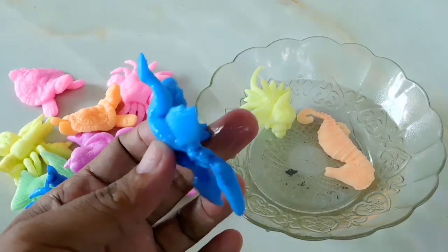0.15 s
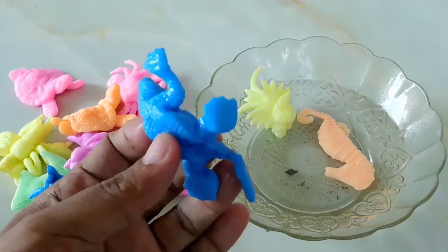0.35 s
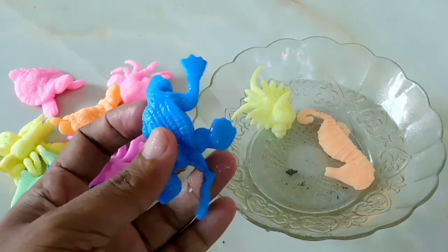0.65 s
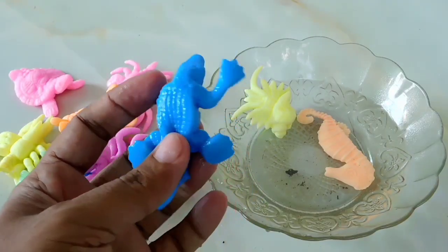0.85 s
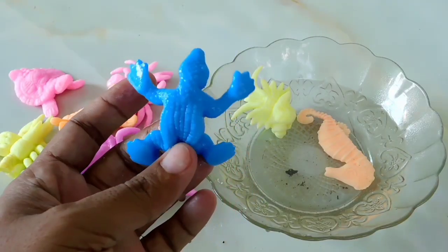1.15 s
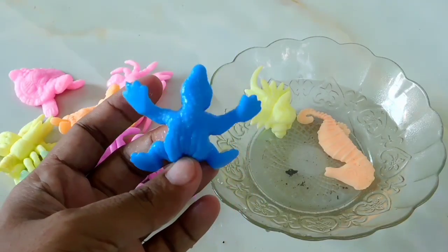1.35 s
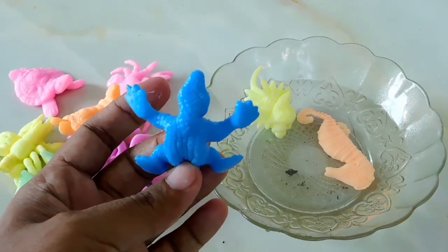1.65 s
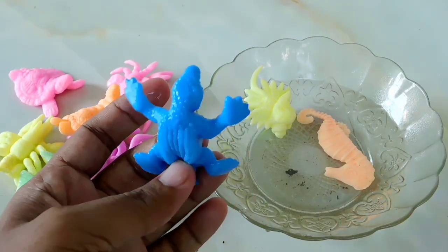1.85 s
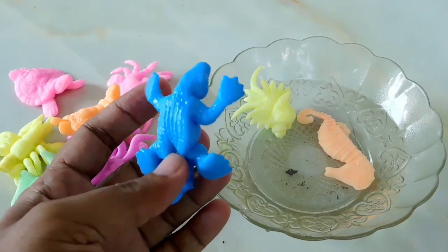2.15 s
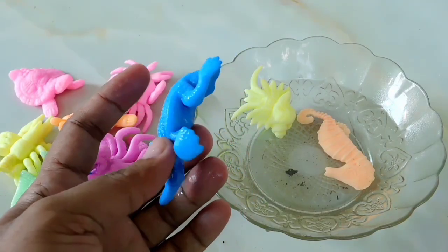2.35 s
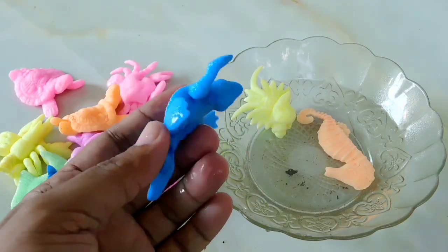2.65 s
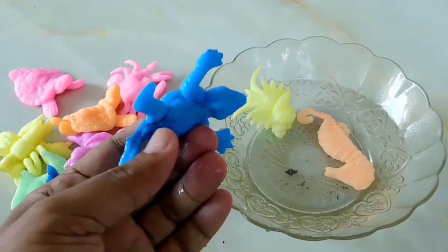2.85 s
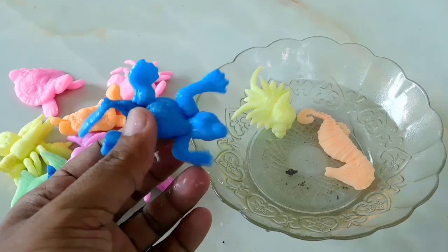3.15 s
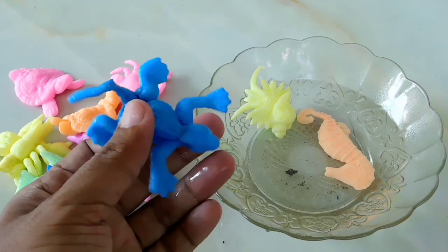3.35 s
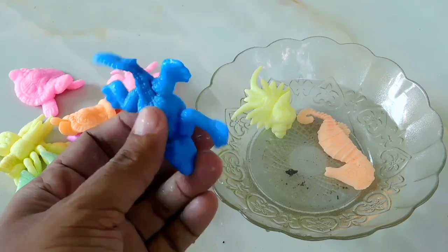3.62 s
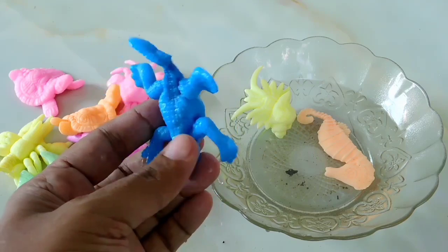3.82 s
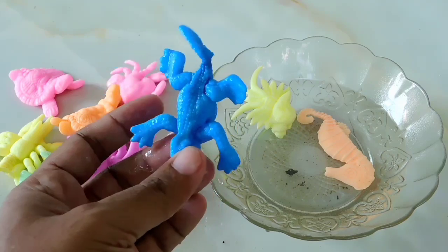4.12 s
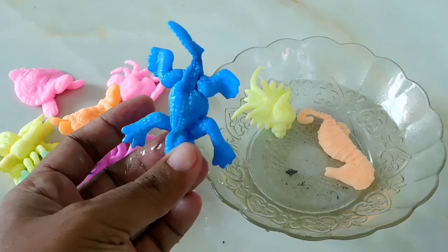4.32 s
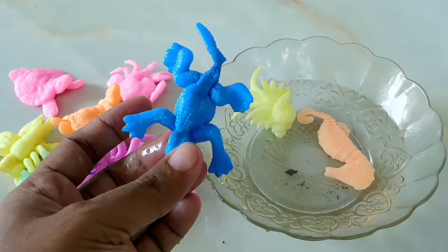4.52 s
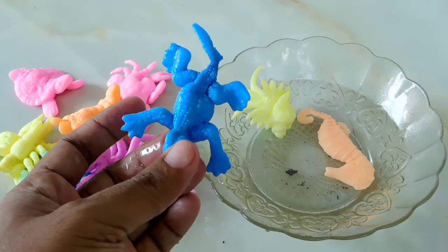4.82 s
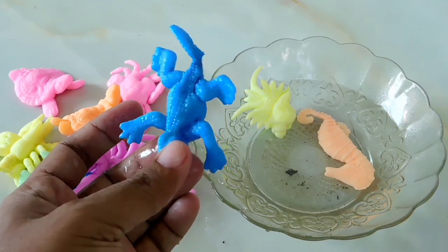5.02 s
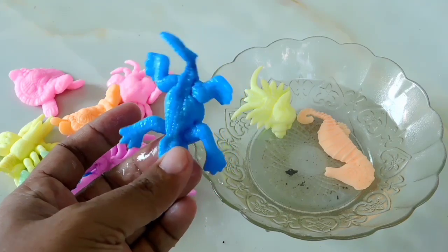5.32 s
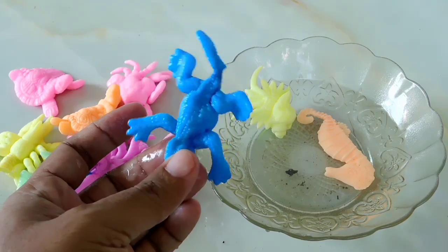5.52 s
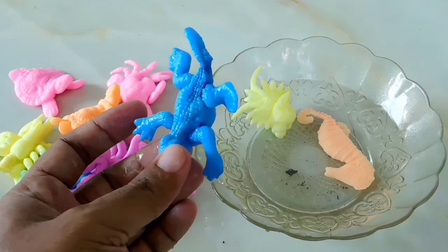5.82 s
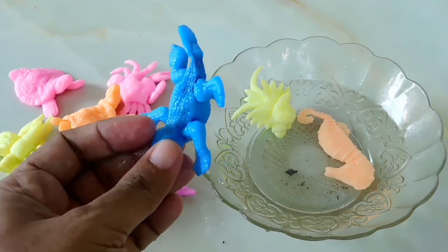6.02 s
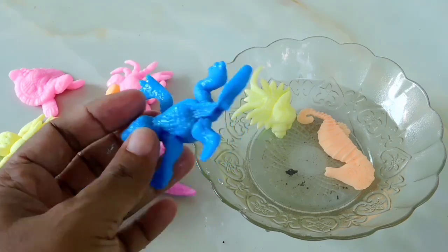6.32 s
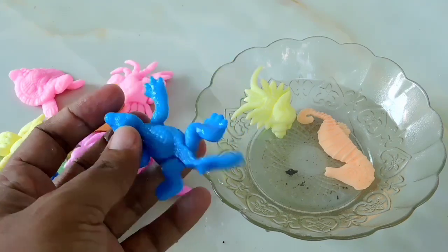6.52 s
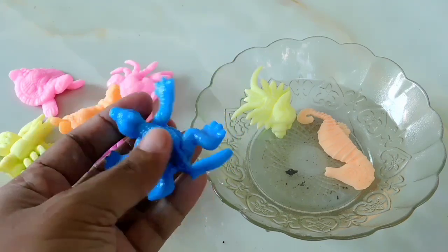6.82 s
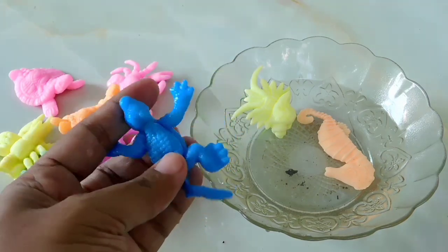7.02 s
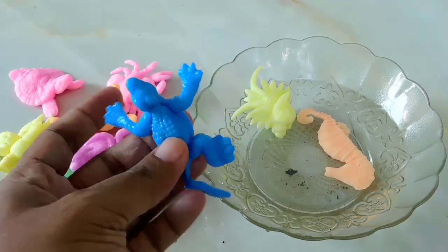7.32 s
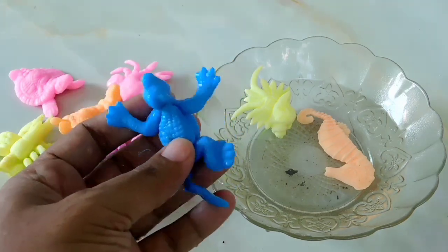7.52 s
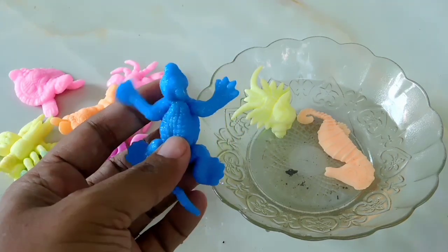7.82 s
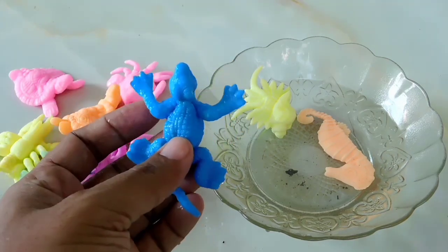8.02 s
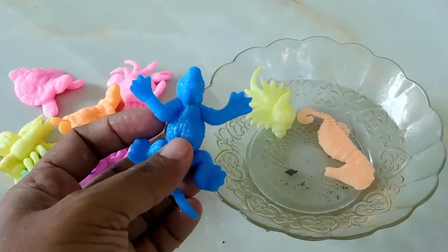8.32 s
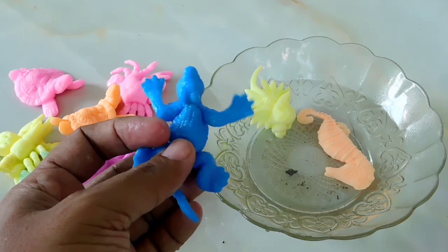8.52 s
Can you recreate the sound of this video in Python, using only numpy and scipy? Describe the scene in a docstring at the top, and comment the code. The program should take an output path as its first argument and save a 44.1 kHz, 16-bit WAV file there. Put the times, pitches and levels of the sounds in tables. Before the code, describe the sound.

Quick irregular water drops tick on a water surface and ring with tiny high bubbles, surrounded by dense fine pattering and soft gurgling. Larger bubbles give short hollow bloops, becoming frequent after the first two seconds. The dripping carries on steadily to the end without stopping. The microphone is close in a small hard room, with dull distant motor rumble outside and slightly noise-suppressed, centred sound.

```python
"""Fast dripping into a water-filled vessel.

Indoors, each drop ticks on the surface (noise burst) and rings two trapped bubbles (damped sines).
Large bubbles sound in the hollow of the vessel, mostly near 1.1 kHz; deeper ones glug below it.
Finer drops patter over fizz and soft gurgling, all with a short hard room tail.
Outside, traffic rumbles (filtered noise, motor orders) with the drone of passing engines (gliding sines)."""
import sys
import numpy as np
from scipy import signal
from scipy.fft import rfft, irfft, next_fast_len
from scipy.io import wavfile
from scipy.ndimage import uniform_filter1d, map_coordinates

SR = 44100
rng = np.random.default_rng(int(sys.argv[2]) if len(sys.argv) > 2 else 0)


def gain_from_decibels(decibels):
    """Convert decibel values to linear amplitude factors."""
    exponent = np.asarray(decibels, float) / 20
    return 10 ** exponent


def dump(signal):
    """Clip the signal to [-1, 1] and save it as 16-bit WAV at the path in sys.argv[1]."""
    limited = np.clip(np.atleast_2d(signal).T, -1, 1)
    pcm = np.round(limited * 32767).astype(np.int16)
    wavfile.write(sys.argv[1], SR, pcm)


N = 382347

# drops, two bubbles each: start_s, peak_db, small_hz, large_hz, large_re_peak_db
DROPS = [(0.042, -37, 4850, 1450, -12), (0.0903, -39.5, 4560, 3060, -17.5), (0.1518, -47, 5010, 3160, -2),
         (0.157, -29, 5260, 2120, -8), (0.228, -37, 4260, 3520, -13.5), (0.2503, -35, 4100, 3580, -2),
         (0.2857, -46.5, 5510, 3060, -2.5), (0.3581, -43.5, 7400, 3050, 1), (0.394, -29, 4860, 3320, -6),
         (0.4237, -26, 6350, 4200, -35.5), (0.441, -27, 6530, 1500, -41), (0.4538, -25, 6490, 2770, -41),
         (0.5046, -33, 5030, 2250, -3.5), (0.5408, -35.5, 5120, 3100, -6), (0.5752, -29.5, 4330, 3010, -10),
         (0.6353, -34.5, 6180, 3000, -11), (0.6618, -38, 6580, 2040, -4), (0.7375, -28.5, 5660, 3250, -8.5),
         (0.7856, -24.5, 6430, 3010, -14), (0.851, -38.5, 6300, 2590, -6), (0.8939, -35, 7180, 2230, -5.5),
         (0.9283, -28.5, 4880, 4090, -8.5), (0.9776, -27.5, 4240, 3210, -6),
         (1.0062, -50.5, 5800, 2090, -14), (1.0262, -27.5, 6120, 3870, -22.5),
         (1.0665, -26, 5920, 2150, -27.5), (1.0985, -47.5, 5630, 2120, -4), (1.1112, -31.5, 4270, 2290, -5),
         (1.1747, -37.5, 5980, 4000, -11), (1.1806, -34.5, 5000, 3920, -8.5),
         (1.1985, -29, 4380, 4150, -19.5), (1.2414, -31.5, 4330, 3330, -9), (1.2995, -26, 6410, 2270, -12),
         (1.3411, -30.5, 5420, 2430, -14), (1.4566, -31, 6330, 3190, -14.5),
         (1.5212, -24, 5150, 3240, -12.5), (1.5634, -33.5, 4460, 3120, -5.5),
         (1.5776, -29.5, 6200, 2500, -8), (1.6106, -37, 6340, 2520, -12.5), (1.623, -27.5, 6350, 3460, 9),
         (1.646, -27, 4100, 3380, 0.5), (1.706, -24, 5300, 3060, -34), (1.739, -34.5, 6500, 3470, -13.5),
         (1.7654, -43, 5700, 3130, -23.5), (1.7983, -30.5, 6250, 3290, -11.5),
         (1.8392, -31.5, 6100, 2750, -22), (1.9734, -37, 4520, 4120, -4), (1.99, -29.5, 4800, 3420, -11.5),
         (2.0235, -29.5, 6620, 2550, -8), (2.0732, -35.5, 4270, 4170, -23.5), (2.1034, -36, 6300, 4120, -4),
         (2.1158, -25.5, 4100, 3580, -7), (2.147, -31, 5950, 2880, -17.5), (2.1846, -27, 6100, 1930, -14.5),
         (2.259, -35, 4150, 3860, -13), (2.2867, -38.5, 7400, 2210, -4), (2.303, -29, 5600, 3490, -9),
         (2.4186, -28.5, 6020, 2000, -13), (2.4428, -30, 7200, 2070, -27), (2.6675, -35.5, 6360, 2170, -19),
         (2.6823, -33.5, 5520, 1830, -28.5), (2.7216, -40, 6330, 3210, -4), (2.7392, -25, 5350, 3310, -10),
         (2.887, -37.5, 6000, 3140, -14), (2.944, -36, 4280, 2410, -6.5), (2.981, -32, 4270, 2040, -12.5),
         (2.9893, -27, 6440, 2030, -14), (3.021, -36, 7300, 2160, -12.5), (3.0651, -32, 6430, 1690, -13.5),
         (3.0852, -31.5, 6050, 3300, -6.5), (3.1186, -32.5, 4800, 3960, -9),
         (3.1632, -31, 5840, 2270, -6.5), (3.2894, -35.5, 6420, 2220, -14.5),
         (3.3036, -29.5, 4300, 2130, -18), (3.3387, -27, 6060, 2150, -6.5), (3.3643, -28, 6570, 3290, -16),
         (3.4077, -27.5, 5980, 2150, -15), (3.488, -40.5, 5440, 1710, -23.5),
         (3.5394, -45, 5030, 1400, -18), (3.5578, -28, 4550, 3690, -6), (3.6094, -27, 5900, 2100, -13),
         (3.7478, -32.5, 6040, 3490, -9.5), (3.7883, -29.5, 6330, 3730, -9),
         (3.827, -30.5, 6120, 2480, -14), (3.856, -29.5, 4370, 2130, -17), (3.914, -31, 5900, 3630, -19),
         (3.937, -23, 4510, 4000, -19), (4.0227, -37.5, 6350, 3230, -7.5), (4.0488, -31, 6480, 2260, -11.5),
         (4.077, -34.5, 7300, 1780, -13.5), (4.155, -31.5, 5380, 2180, -17.5),
         (4.1665, -32.5, 5140, 4270, -13.5), (4.2023, -30, 7470, 2110, -22), (4.2413, -29, 6070, 4140, -19),
         (4.2926, -27, 4780, 3270, -8), (4.3185, -36, 5030, 3350, -8), (4.341, -32.5, 5040, 2080, -11.5),
         (4.384, -30.5, 6700, 3100, -4), (4.4653, -39, 5360, 4200, -14.5), (4.485, -31, 4920, 2120, -8),
         (4.58, -34, 4990, 2750, -12.5), (4.6374, -41, 6700, 4030, -30), (4.6724, -33.5, 4300, 3040, -10),
         (4.7398, -33, 5260, 4260, -15), (4.808, -25, 6450, 4170, -9), (4.8778, -38, 5080, 2090, -5),
         (4.9406, -53, 4350, 2120, 0), (4.9538, -34, 5330, 3010, -14.5), (4.9784, -25, 6840, 3080, -15),
         (4.9955, -25.5, 6430, 3270, -12.5), (5.0593, -39, 5080, 2530, -7), (5.0877, -29, 6580, 2220, -23),
         (5.2101, -25, 5850, 3500, -21), (5.3222, -34.5, 6230, 3420, -5.5),
         (5.3499, -23, 5900, 4270, -15.5), (5.367, -25, 7530, 2960, -27), (5.4412, -36, 6330, 3070, -9),
         (5.4752, -32, 4250, 2030, -5.5), (5.4948, -27.5, 6200, 1850, -16.5), (5.577, -31, 7270, 2110, -10),
         (5.6173, -30.5, 5200, 4150, -10.5), (5.6436, -24, 6650, 2150, -7), (5.7254, -37.5, 4920, 2100, -6),
         (5.7446, -36, 5370, 4130, -30.5), (5.766, -43, 4920, 4150, -18.5),
         (5.7892, -29.5, 4250, 4300, -16), (5.8086, -33, 4360, 4240, -19.5),
         (5.8267, -25, 5160, 1850, -18.5), (5.903, -39.5, 6570, 3270, -18), (5.9444, -39, 4750, 1920, -7.5),
         (5.9584, -31.5, 7230, 1720, -7), (6.004, -31, 6370, 3350, -7.5), (6.0648, -30.5, 4260, 4240, -4.5),
         (6.204, -30.5, 5890, 3080, -5), (6.2554, -34.5, 6180, 2360, -5), (6.2808, -31, 6450, 3520, -16),
         (6.354, -34, 5900, 3300, -4), (6.465, -34.5, 6580, 3850, -9), (6.499, -34, 5950, 2920, -9.5),
         (6.5118, -25, 4660, 3320, -6), (6.568, -33, 4260, 4130, -11.5), (6.5879, -31, 5560, 3520, -10.5),
         (6.6303, -30, 6100, 2060, -21.5), (6.6624, -25, 4600, 4060, -17.5),
         (6.738, -43, 6350, 1550, -13.5), (6.7585, -32, 5300, 2100, -7.5),
         (6.7897, -25.5, 6540, 3650, -20.5), (6.8409, -23.5, 5480, 2180, -11.5),
         (6.9353, -38, 5600, 3040, -27.5), (6.9819, -22, 6160, 2240, -27), (7.0062, -35.5, 5980, 3240, -10),
         (7.0366, -32, 4930, 3340, -7.5), (7.0857, -34, 4660, 3180, -15), (7.1951, -36, 5330, 3090, -4),
         (7.206, -22, 5680, 2350, -6), (7.2318, -26, 5780, 2100, -19.5), (7.2673, -29, 4940, 3530, -11),
         (7.3188, -33.5, 5360, 1840, -7.5), (7.3642, -24, 6270, 2310, -21),
         (7.4666, -34.5, 6360, 3420, -30.5), (7.5025, -34.5, 4870, 2840, -19.5),
         (7.5633, -35.5, 4810, 2130, -15.5), (7.5752, -40, 6180, 3310, -12.5),
         (7.6038, -26, 6280, 2200, -17), (7.649, -52, 5360, 3120, -5), (7.675, -30.5, 6470, 3140, -3.5),
         (7.7283, -38.5, 5600, 2100, 9), (7.7647, -48.5, 5150, 2090, -12),
         (7.7955, -52.5, 4390, 1490, -11.5), (7.7962, -40, 4900, 1440, -26.5), (7.82, -26, 7300, 2210, -11),
         (7.9354, -40.5, 6240, 3000, -5.5), (7.9738, -36, 4760, 2480, -10), (8.0332, -27, 5680, 3320, -17),
         (8.0679, -25.5, 6400, 2260, -23), (8.1363, -23, 4860, 2140, -8.5),
         (8.1697, -48.5, 4960, 2080, -21.5), (8.2237, -41.5, 6420, 2210, -5),
         (8.2357, -31, 6400, 2140, -9.5), (8.296, -32, 6530, 3910, -22), (8.2962, -29, 6100, 3530, -13),
         (8.306, -23.5, 6250, 3700, -9), (8.3489, -34, 6040, 4160, -10.5), (8.3722, -33.5, 6200, 3340, -8),
         (8.4105, -23.5, 5480, 1930, -20), (8.4629, -34, 6250, 2800, -28.5),
         (8.4814, -20.5, 6120, 3630, -9), (8.6067, -38.5, 5050, 3890, -12),
         (8.6497, -49, 7330, 1500, -25.5), (8.6483, -31, 5340, 2860, -15)]
# large bubbles: start_s, peak_db, pitch_hz, t60_s
PLOPS = [(0.157, -32, 1120, 0.098), (0.23, -40, 1178, 0.015), (0.287, -45, 733, 0.033),
         (0.341, -39.5, 1204, 0.023), (0.438, -41, 1240, 0.017), (0.578, -41.5, 1190, 0.023),
         (0.852, -41, 1211, 0.11), (0.929, -37.5, 1143, 0.033), (1.099, -47.5, 1034, 0.051),
         (1.172, -44, 1203, 0.035), (1.35, -34, 1190, 0.045), (1.411, -36, 1107, 0.079),
         (1.591, -39, 1142, 0.033), (1.801, -43.5, 1220, 0.019), (1.85, -46.5, 1190, 0.045),
         (1.92, -38, 1150, 0.039), (2.126, -36.5, 1119, 0.045), (2.204, -32.5, 1306, 0.045),
         (2.261, -35, 1188, 0.045), (2.306, -34.5, 1212, 0.029), (2.423, -38, 1290, 0.026),
         (2.485, -31.5, 1170, 0.016), (2.544, -40, 637, 0.14), (2.652, -33, 1180, 0.017),
         (2.758, -37, 1148, 0.071), (2.822, -36.5, 1157, 0.045), (2.965, -37, 1223, 0.045),
         (2.993, -41, 1170, 0.034), (3.024, -32, 1201, 0.045), (3.127, -41.5, 1173, 0.076),
         (3.185, -31.5, 1094, 0.045), (3.424, -38, 1250, 0.024), (3.568, -33, 1233, 0.021),
         (3.667, -39.5, 1163, 0.017), (3.724, -41.5, 1230, 0.019), (3.787, -29, 1131, 0.066),
         (3.959, -42, 1060, 0.12), (4.002, -35.5, 1157, 0.025), (4.051, -32, 1276, 0.053),
         (4.104, -31, 1125, 0.032), (4.15, -35.5, 1270, 0.031), (4.181, -33, 1173, 0.037),
         (4.43, -41.5, 705, 0.042), (4.486, -33, 1113, 0.089), (4.587, -33.5, 1120, 0.099),
         (4.908, -39.5, 1210, 0.022), (4.938, -41, 1138, 0.066), (5.134, -37, 1282, 0.068),
         (5.229, -32, 1277, 0.063), (5.401, -41, 1158, 0.022), (5.582, -42, 1483, 0.027),
         (5.635, -33.5, 1155, 0.018), (5.706, -45, 1280, 0.037), (5.787, -48, 840, 0.062),
         (5.966, -38.5, 1155, 0.14), (6.085, -34, 1160, 0.061), (6.569, -36, 1100, 0.07),
         (6.742, -34.5, 1224, 0.033), (6.832, -32.5, 1253, 0.045), (6.89, -40, 1205, 0.074),
         (7.061, -36, 1120, 0.13), (7.383, -40.5, 1102, 0.032), (7.522, -26.5, 1223, 0.059),
         (7.606, -32, 1162, 0.051), (7.789, -36.5, 1173, 0.026), (7.983, -36.5, 1177, 0.026),
         (8.047, -37.5, 1266, 0.038), (8.138, -46.5, 1154, 0.045), (8.19, -49.5, 1025, 0.036),
         (8.237, -36, 1084, 0.054), (8.316, -38, 1038, 0.031), (8.35, -39.5, 1124, 0.044),
         (8.386, -39.5, 1265, 0.045), (8.418, -38, 1192, 0.054), (8.509, -29.5, 1119, 0.018)]
# deep bubbles below the hollow: start_s, peak_db, pitch_hz, t60_s
GLUGS = [(1.591, -44, 833, 0.05), (1.992, -46, 770, 0.06), (2.129, -39.5, 786, 0.046),
         (2.26, -40, 736, 0.071), (3.021, -50, 814, 0.091), (4.718, -51, 680, 0.071),
         (4.752, -43.5, 665, 0.086), (4.908, -49, 770, 0.072), (5.027, -42, 814, 0.035),
         (5.475, -48, 746, 0.06), (5.496, -50.5, 790, 0.06), (7.604, -54, 784, 0.13)]
# ringing of the vessel: centre_hz, width_hz, level_db
VESSEL_MODES = [(720, 15, -11.5), (1140, 600, -5.5), (1850, 16, -65.5), (1965, 80, -15), (2593, 23, -8.5),
                (3119, 65, 0), (4084, 42, -6), (4362, 120, -1.5), (5324, 870, -6), (6340, 107, 5),
                (7250, 95, -4.5), (7460, 140, -9), (8780, 330, -18.5)]
# ringing of the air over the water: centre_hz, width_hz, level_db
HOLLOW_MODES = [(1160, 28, -4.5), (1147, 29, -12.5), (1180, 27, 18), (1370, 90, -12.5)]
# dips of the fine patter: middle_s, length_s, depth_db
LULLS = [(0.012, 0.04, 1), (0.121, 0.057, -11), (0.291, 0.36, -6), (0.48, 0.058, -6.5),
         (0.713, 0.086, -5.5), (1.283, 0.08, -14), (1.393, 0.048, -2.5), (1.488, 0.04, -8),
         (1.969, 0.037, -11.5), (2.232, 0.029, -7), (3.27, 0.056, -11), (3.53, 0.1, -10),
         (4.548, 0.052, -4), (4.874, 0.039, -8), (5.163, 0.076, -10.5), (5.566, 0.028, -25),
         (5.93, 0.03, -17.5), (6.34, 0.041, -13.5), (6.692, 0.08, -3.5), (7.184, 0.14, -8.5),
         (7.864, 0.074, -3.5), (8.132, 0.088, -12), (8.203, 0.044, -13), (8.591, 0.078, -9.5)]
# fizz spectrum, relative: freq_hz, density_db
FIZZ_SPECTRUM = [(350, -39.5), (500, 4.5), (800, -6), (1140, 10), (1600, -24.5), (2100, -14), (6300, 0.5),
                 (10000, -63.5), (13000, -72)]
# room decay: freq_hz, t60_s
ROOM_DECAY = [(600, 0.7), (1300, 0.092), (3500, 0.063), (9000, 0.04)]
# background rumble and road noise as heard, brief dips of the level included: time_s, road_db, rumble_db
BACKGROUND_LEVELS = [(0.0, -60.5, -43), (0.02, -53, -46.5), (1.21, -58.5, -51), (1.42, -57.5, -49.5),
                     (1.45, -62, -49.5), (2.92, -62.5, -52), (2.97, -60, -50), (4.54, -67.5, -51),
                     (4.59, -77, -54), (4.73, -65, -55), (6.2, -69, -55.5), (8.14, -69.5, -54.5),
                     (8.16, -86, -62), (8.26, -70, -53), (8.45, -78, -56.5), (8.67, -66.5, -56.5)]
# rumble spectrum, relative: freq_hz, density_db
RUMBLE_SPECTRUM = [(15, -54.5), (25, -18), (38, -23), (75, 0), (97, -1), (155, 1.5), (220, -14), (260, -21),
                   (340, -26.5), (570, -120)]
# road noise spectrum, relative: freq_hz, density_db
ROAD_SPECTRUM = [(160, -35), (210, -3.5), (300, -5), (400, 1), (600, -15), (900, -12.5), (1200, -61)]
# orders of the idling motor: multiple, level_re_rumble_db
MOTOR_ORDERS = [(3, -21.5), (4, -14), (5, -9), (6, -14), (7, -11), (8, -14.5), (9, -26), (10, -35)]
# engine drones: start_s, end_s, first_hz, last_hz, level_db
ENGINES = [(0, 1.5, 92.4, 91.9, -52), (0, 1.3, 135.8, 135, -49.5), (0.602, 3.3, 113.1, 115.5, -59.5),
           (2.801, 3.62, 152.8, 142.2, -49.5), (3.451, 5.1, 90.06, 90.75, -49),
           (4.901, 5.62, 91.44, 86.3, -49.5), (5.798, 6.86, 163.9, 159.7, -55.5)]
# gain of the faint side signal: freq_hz, gain_db
SIDE_GAIN = [(60, -53.5), (300, -46), (1000, -59.5), (3000, -53), (6000, -41), (10000, -16)]
# microphone response: freq_hz, gain_db
MIC_RESPONSE = [(20, 0.5), (6500, 0.5), (8000, 3.5), (9600, -3), (9900, -29), (10400, -29)]


def drops():
    """Each drop splashes raggedly, rings its bubbles for some tens of cycles and shakes the vessel."""
    start_s, peak_db, pitch_hz = trapped_bubbles()
    late, weaker = rng.random((len(start_s), 2)).T
    splash = ticks(start_s, peak_db, t60_s=0.012)
    # a droplet falls back
    fallback = ticks(start_s + 0.0052 + 0.02 * late, peak_db - 16.5 - 10 * weaker, t60_s=0.0073)
    tick = splash + fallback
    ring = bubbles(start_s, peak_db, pitch_hz, 0.006 + 42 / pitch_hz,
                   rise=0.016, attack_s=0.00048, rough=0.51, size=1500)
    vessel = filtered(tick, resonances(VESSEL_MODES[2:], ratio=-1))
    return ring + gain_from_decibels(-16.5) * tick + gain_from_decibels(7.5) * vessel


def trapped_bubbles():
    """Start, peak dB and pitch of both bubbles of every drop; they share its energy."""
    ring_db, crest_db = -5, 6  # bubbles' part of the drop's peak; bubble peak over its mean level
    least_share, lag_s = 0.11, 0.001009  # least energy share of the small bubble; delay of the large
    start_s, peak_db, small_hz, large_hz, large_db = np.transpose(DROPS)
    large_share = np.clip(gain_from_decibels(large_db + crest_db) ** 2, 1e-4, 1 - least_share)
    small_peak_db = peak_db + 10 * np.log10(1 - large_share)
    large_peak_db = peak_db + 10 * np.log10(large_share)
    return (np.r_[start_s, start_s + lag_s],
            np.r_[small_peak_db, large_peak_db] + ring_db,
            np.r_[small_hz, large_hz])


def plops():
    """Large bubbles swell over a few cycles; their splash leaves the hollow beating."""
    start_s, peak_db, pitch_hz, t60_s = np.transpose(PLOPS + GLUGS)
    tone = bubbles(start_s, peak_db, pitch_hz, t60_s, rise=0.031, attack_s=0.0013, rough=0.046, size=5000)
    tick = ticks(start_s, peak_db, t60_s=0.011)
    hollow = filtered(tick, resonances(HOLLOW_MODES, ratio=1))
    return tone + gain_from_decibels(-13) * tick + gain_from_decibels(7.5) * hollow


def bubbles(start_s, peak_db, pitch_hz, t60_s, rise, attack_s, rough, size):
    """Damped sines climbing by the share rise over t60; two weaker neighbours make each one beat."""
    t = np.arange(size) / SR
    peak_db, pitch_hz = peak_db[:, None], pitch_hz[:, None]
    t60_s = np.clip(t60_s, 0.003, 0.3)[:, None]
    turns = pitch_hz * t * (1 + 0.5 * rise * t / t60_s)
    ring = np.sin(2 * np.pi * turns)
    for offset in rng.standard_normal((2, len(start_s), 1)):
        ring += rough * np.sin(2 * np.pi * turns * (1 + 0.075 * offset))
    ring *= gain_from_decibels(-60 * t / t60_s) * (1 - np.exp(-t / attack_s)) ** 2
    peak = np.abs(ring).max(axis=1)[:, None]
    return laid(start_s, gain_from_decibels(peak_db) * ring / peak)


def ticks(start_s, level_db, t60_s):
    """Surface impact: a noise burst a few ms long."""
    t = np.arange(400) / SR
    envelope = gain_from_decibels(level_db[:, None] - 60 * t / t60_s) * (1 - np.exp(-t / 0.0001))
    return laid(start_s, envelope * rng.standard_normal((len(start_s), len(t))))


def patter(count, gurgles):
    """Random fine drops, many weak and few strong, over fizz and gurgles; thickest just after each drop."""
    when, pitch, strength = rng.random((count, 3)).T
    start_s = when * N / SR
    peak_db = -3 * np.log(1 - 0.93 * strength)
    pitch_hz = 1700 * 4.5 ** pitch
    t60_s = (25 + 70 * rng.random(count) ** 2) / pitch_hz
    tone = bubbles(start_s, peak_db, pitch_hz, t60_s, rise=0.2, attack_s=0.00058, rough=0.51, size=900)
    grains = tone + gain_from_decibels(-5.5) * ticks(start_s, peak_db, t60_s=0.016)
    vessel = filtered(grains, resonances(VESSEL_MODES, ratio=-0.96))
    grains = unit(gain_from_decibels(-13.5) * grains + vessel)
    fizz = noise(FIZZ_SPECTRUM, swell_db=2, rate_hz=30)
    thrown = thrown_level()
    spray_level = gain_from_decibels(spray_db()) + thrown
    gurgle_level = gain_from_decibels(-59.5 + 2.9 * wander(9)) + gain_from_decibels(-2) * thrown  # goes on through the lulls
    return spray_level * (grains + gain_from_decibels(-7.5) * fizz) + gurgle_level * gurgles


def thrown_level():
    """Extra spray level: a quick rise and decay after each trapped bubble's start."""
    t = np.arange(3000) / SR
    start_s, peak_db, _ = trapped_bubbles()
    decay = gain_from_decibels(peak_db[:, None] - 33.5 - 60 * t / 0.15)
    return laid(start_s, decay * (1 - np.exp(-t / 0.00033)))


def spray_db():
    """Base level of the fine drops, wavering, with smooth dips at the lulls."""
    block = 64  # samples
    middle_s, length_s, depth_db = np.transpose(LULLS)[:, :, None]
    away = (np.arange(0, N, block) / SR - middle_s) / (length_s / 2)
    dips_db = (depth_db * np.exp(-away ** 4)).sum(axis=0)
    return -55 + np.repeat(dips_db, block)[:N] + 1.5 * wander(12)


def gurgle(count):
    """Soft overlapping bubbles, most at the pitches of the hollow, one in five lower and fainter."""
    when, pitch, strength, life = rng.random((count, 4)).T
    low = rng.random(count) < 0.2
    peak_db = -4 * np.log(1 - 0.9 * strength) - 8 * low
    pitch_hz = np.where(low, 480 + 400 * pitch, 1030 + 300 * pitch)
    return unit(bubbles(when * N / SR, peak_db, pitch_hz, 0.022 + 0.11 * life,
                        rise=0.13, attack_s=0.0025, rough=0.13, size=3500))


def room(x):
    """Small hard room: decaying noise tails; a new one every 0.3 s as the water surface moves."""
    out, step = np.zeros(N + SR), SR * 3 // 10
    for start in range(0, N, step):
        hz, t, z = signal.stft(rng.standard_normal(SR // 3), SR, nperseg=256)
        decay = gain_from_decibels(-60 * t / along(ROOM_DECAY, hz)[:, None])
        tail = signal.istft(z * decay, SR, nperseg=256)[1]
        echo = signal.fftconvolve(x[start:start + step], tail / np.linalg.norm(tail))
        out[start + 150:][:len(echo)] += echo  # 150 samples of delay
    return out[:N]


def traffic():
    """Rumble through the walls with the orders of an idling motor, road noise above it, and drones."""
    time_s, road_db, rumble_db = np.transpose(BACKGROUND_LEVELS)
    t = np.arange(N) / SR
    rumble = gain_from_decibels(0.5) * noise(RUMBLE_SPECTRUM, swell_db=0.5, rate_hz=8) + motor()
    road = noise(ROAD_SPECTRUM, swell_db=3.5, rate_hz=8)
    out = gain_from_decibels(np.interp(t, time_s, rumble_db)) * rumble
    out += gain_from_decibels(np.interp(t, time_s, road_db)) * road
    return out + engines()


def motor():
    """Idling motor: sines at multiples of one wandering rate, each with its own swell."""
    turns = np.cumsum(22.68 + 0.0917 * wander(2.945)) / SR
    return sum(gain_from_decibels(db + 2.5 * wander(3)) * np.sin(2 * np.pi * (multiple * turns + rng.random()))
               for multiple, db in MOTOR_ORDERS)


def engines():
    """Passing engines: sines of gliding, wandering pitch that fade in and out."""
    t, out = np.arange(N) / SR, np.zeros(N)
    for start_s, end_s, first_hz, last_hz, level_db in ENGINES:
        fade = np.clip(np.minimum(t - start_s + 0.1, end_s - t) / 0.2, 0, 1)
        hz = np.interp(t, [start_s, end_s], [first_hz, last_hz]) + 1.507 * wander(5)
        out += fade * gain_from_decibels(level_db + 4.3 * wander(9.7)) * np.sin(2 * np.pi * np.cumsum(hz) / SR)
    return out


def noise(spectrum, swell_db, rate_hz):
    """Coloured noise of rms 1 whose level wanders."""
    coloured = filtered(rng.standard_normal(N), lambda hz: gain_from_decibels(along(spectrum, hz)))
    return unit(gain_from_decibels(swell_db * wander(rate_hz)) * coloured)


def wander(rate_hz):
    """Smooth random curve, rate_hz knots a second."""
    knots = rng.standard_normal(int(N * rate_hz / SR) + 4)
    return map_coordinates(knots, [np.arange(N) * rate_hz / SR])


def resonances(modes, ratio):
    """Causal response of summed modes, the k-th scaled by ratio**k; a negative ratio fills the valleys."""
    def response(hz):
        total = 0
        for k, (centre_hz, width_hz, level_db) in enumerate(modes):
            damping = 1j * hz * width_hz
            total = total + ratio ** k * gain_from_decibels(level_db) * damping / (centre_hz ** 2 - hz ** 2 + damping)
        return total
    return response


def filtered(x, response):
    """x through a complex response of frequency."""
    m = next_fast_len(N + 8192)
    return irfft(rfft(x, m) * response(np.fft.rfftfreq(m, 1 / SR)), m)[..., :N]


def along(points, hz):
    """(freq_hz, value) points read on a log frequency axis."""
    freq_hz, value = np.transpose(points)
    return np.interp(np.log(hz + 1), np.log(freq_hz + 1), value)


def laid(start_s, sounds):
    """Rows of short sounds summed at their start times."""
    at = np.round(start_s * SR).astype(int)[:, None] + np.arange(sounds.shape[1])
    return np.bincount(at.ravel(), sounds.ravel(), N + SR)[:N]


def unit(x):
    """Scaled to rms 1."""
    return x / np.sqrt(np.mean(x ** 2) + 1e-20)


def scene():
    """Water, room and traffic, practically mono."""
    water = drops() + plops() + patter(count=1700, gurgles=gurgle(count=400))
    mid = water + gain_from_decibels(-14) * room(water) + traffic()
    faint = filtered(room(water) + traffic(), lambda hz: gain_from_decibels(along(SIDE_GAIN, hz)))
    side = gain_from_decibels(4 * wander(15)) * faint
    return np.array([mid + side, mid - side])


def suppressor(x, knee_db, depth_db):
    """Noise suppression: bands weak against their median power are turned down, by depth_db at most."""
    z = signal.stft(x, nperseg=512)[2]
    power = uniform_filter1d(np.abs(z[0] + z[1]) ** 2 / 4, size=12, axis=0)
    usual = np.median(power, axis=1, keepdims=True)
    gain = power / (power + usual * gain_from_decibels(2 * knee_db))
    return signal.istft(z * np.maximum(gain, gain_from_decibels(depth_db)), nperseg=512)[1][:, :N]


def roll_off(x):
    """The treble ends steeply here."""
    return signal.sosfilt(signal.butter(12, 10330, fs=SR, output="sos"), x)


def record(dry):
    """The microphone rolls off and stops near 10 kHz; quiet moments are suppressed."""
    heard = filtered(dry, lambda hz: gain_from_decibels(along(MIC_RESPONSE, hz)))
    mix = suppressor(heard, knee_db=-5.5, depth_db=-4.5)
    return roll_off(mix)


dry = scene()
out = record(dry)
dump(out)
```